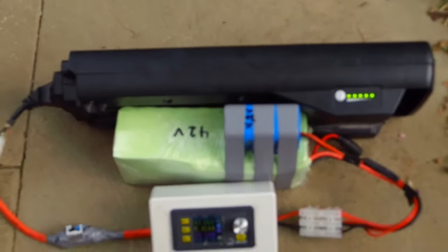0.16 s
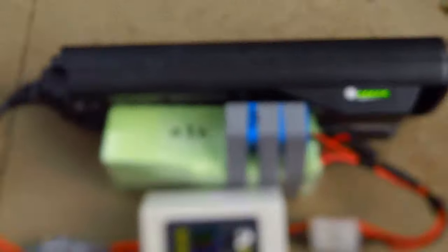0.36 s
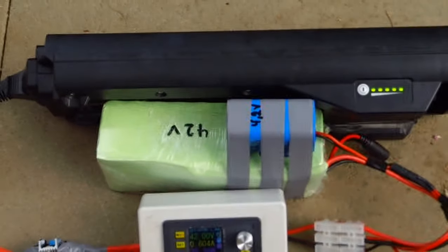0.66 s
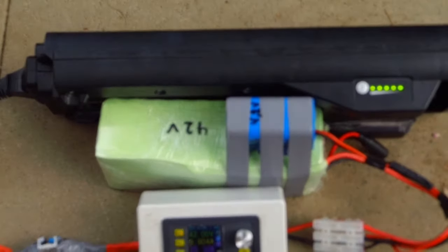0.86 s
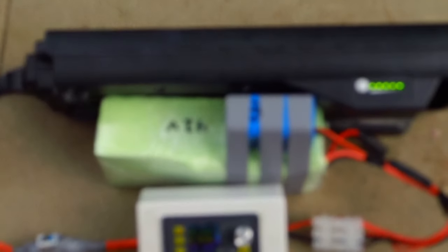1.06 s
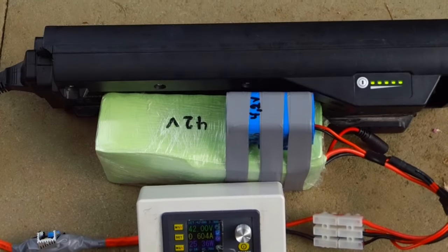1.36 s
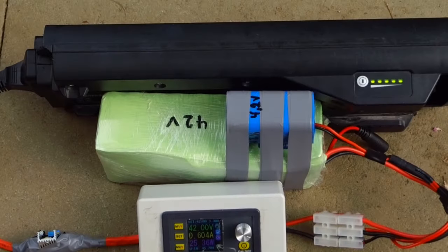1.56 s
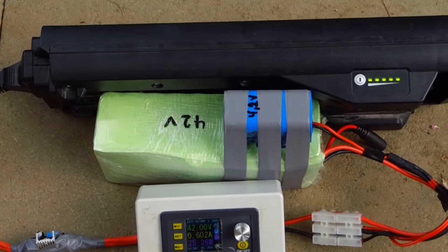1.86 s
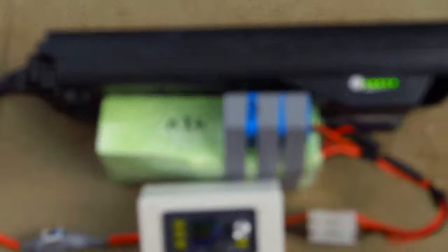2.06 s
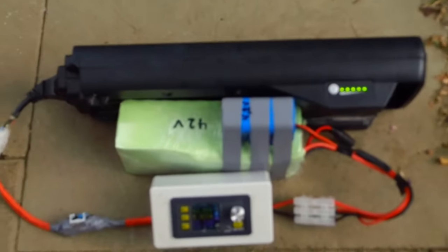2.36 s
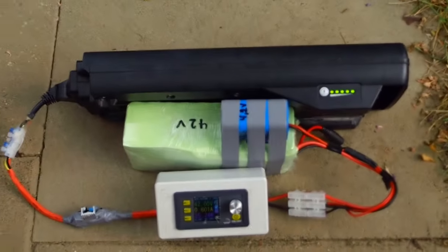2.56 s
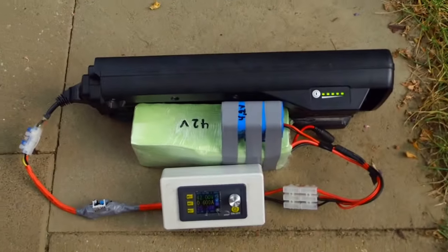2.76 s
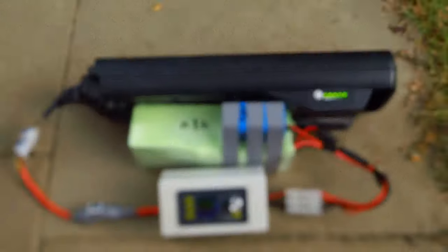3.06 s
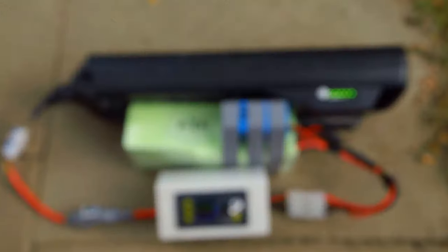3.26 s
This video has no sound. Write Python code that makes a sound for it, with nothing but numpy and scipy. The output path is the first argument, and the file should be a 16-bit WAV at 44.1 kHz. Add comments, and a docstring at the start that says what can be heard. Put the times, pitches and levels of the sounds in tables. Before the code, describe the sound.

Camera lens motor whirs in two quick spurts, then soft ring ticks and scattered plastic clicks, a long one-second zoom whir and a final spurt with knocks, heard through the camera's own stereo microphones outdoors.

```python
"""A geared lens motor whirs in a short spurt over quiet outdoor hiss, then fingers click and knock on the shell.
This is a handheld camera heard through its own stereo microphones; two rubs are noise with fine catches.
Clicks are noise cracks plus decaying modes; ring ticks are soft noise bursts; the motor is noise pulsed by gear
teeth, in short spurts around one long zoom. Band-passed noise makes the whines of the sliding lens and one
broad treble hiss near 2.5 s. The outdoor hiss is coloured noise that sinks and returns."""
import sys
import numpy as np
from scipy import signal
from scipy.fft import rfft, irfft
from scipy.io import wavfile
from scipy.ndimage import uniform_filter1d

SR = 44100
rng = np.random.default_rng(int(sys.argv[2]) if len(sys.argv) > 2 else 0)


def waveform_to_disk(signal):
    """Save audio, clipped to [-1, 1], as 16-bit WAV at the path in sys.argv[1]."""
    frames = np.transpose(np.atleast_2d(signal))
    scaled = np.clip(frames, -1, 1) * 32767
    samples = np.round(scaled).astype(np.int16)
    wavfile.write(sys.argv[1], SR, samples)


N = 149940

# contacts on the shell: (time [s], knock level [dB], clack level [dB], snap level [dB], tick level [dB],
# left minus right [dB], pitch of the struck spot [Hz], its t60 [s], contact time [s])
CLICKS = [(0.194,-54,-41,-36.5,-38,-2,3040,.02,0.00055), (0.2294,-39,-31,-20.5,-38,-2.5,2450,0.016,0.00086),
          (.25,-30.5,-27.5,-42,-41,6,1420,0.014,0.00068), (0.4597,-49.5,-42.5,-45,-72,1,2420,0.039,0.0013),
          (.5135,-58,-52.5,-55,-70,4,3840,.012,0.0036), (1.3221,-42,-31,-31.5,-29.5,-6,4310,0.008,0.00095),
          (1.339,-39,-36,-39,-50,-10,4500,0.0087,0.0014),
          (1.363,-41.5,-33.5,-56,-59,-2.5,2000,0.013,0.00061),
          (1.4291,-59,-43.5,-51,-48.5,-9,2966,0.032,0.0022),
          (1.5026,-65,-39,-52.5,-70,-9,2400,0.07,0.00042),
          (1.7228,-48.5,-40.5,-43.5,-34.5,-2.5,2590,0.036,0.00029),
          (1.7374,-44,-39,-44,-37,-4.5,2000,0.028,0.00019), (1.7527,-46,-47,-53,-55,-2.5,2350,.02,0.00075),
          (1.894,-53,-39,-46,-49,2,4070,0.035,.0008),
          (1.9511,-37.5,-30.5,-17.5,-24.5,-1.5,3480,.014,0.00074),
          (1.9818,-38.5,-34.5,-41.5,-42,0.5,2230,0.013,0.00056),
          (2.895,-54,-43,-33,-44,-2,2510,0.055,0.0014), (2.9343,-36.5,-33.5,-21,-35,-5,2655,0.029,0.00097),
          (2.9432,-33,-38,-47,-43,-2,3660,0.014,0.0012), (2.961,-32,-30.5,-44,-51,7,922,0.034,0.00091),
          (3.221,-46.5,-45.5,-53,-63,4,2910,0.044,0.0035), (3.2447,-51,-44.5,-54,-61,-1,1960,0.047,0.0016),
          (3.3696,-46.5,-50,-56,-72,6,1570,.03,0.0016)]
# knock, clack, snap and tick registers: (low [Hz], high [Hz], crack decay [s], shell ring against crack [dB])
CLICK_REGISTERS = [(755, 1610, 0.0012, -8), (1780, 4000, 0.0018, -11), (5060, 8770, 0.00054, -6),
                   (9500, 13150, 0.00052, -18.5)]
# modes of the plastic shell, levels relative: (centre frequency [Hz], level [dB], t60 [s])
SHELL_MODES = [(1005,2,0.035), (1237,4,0.036), (1466,4.5,0.02), (1800,-7.5,0.033), (2360,-22,0.054),
               (2720,8,0.025), (3180,4.5,0.03), (4150,15,0.013), (6260,4.5,0.011), (7350,-1,0.0085),
               (7940,5,0.009), (9040,-9,0.0087), (11250,-17,.008), (12200,0.5,.007)]
# soft ticks of the turning ring, before RING_GAIN_DB: (time [s], level [dB])
RING_TICKS = [(.634, -44), (.6665, -44.5), (0.698, -51), (0.734, -51.5), (.768, -52), (.811, -51),
              (0.835, -53.5), (.867, -54.5), (.9, -53.5), (0.9367, -54), (.968, -55), (1.012, -53.5),
              (1.036, -55.5), (1.133, -64.5), (1.1647, -58.5), (1.266, -61)]
# relative spectrum of a ring tick: (frequency [Hz], level [dB])
RING_COLOUR = [(200, -18), (500, -7.5), (900, -4.5), (1200, -4.5), (1550, 8), (2000, -10.5), (2500, -3),
               (3100, -13), (3800, -4.5), (5000, -19), (8000, -20), (15000, -48)]
# runs of the lens motor: (start [s], stop [s], level at mid-run [dB], mean gear rate [Hz])
MOTOR_RUNS = [(-.02, 0.135, -46.5, 125), (0.183, 0.301, -39.5, 224), (1.83, 1.896, -54.5, 133),
              (1.886, 2.839, -41.5, 157.5), (2.887, 3.008, -38, 224.7)]
# relative spectrum of the whir: (frequency [Hz], level [dB])
MOTOR_COLOUR = [(40, -24), (150, -27), (350, -17), (680, -12), (950, -6), (1500, -5.5), (2200, -9),
                (3700, -10.5), (5000, -11.5), (6500, -9), (8500, -13.5), (10500, -14), (13000, -10),
                (14000, -19), (16000, -29)]
# resonances of the lens barrel, levels relative: (frequency [Hz], width [Hz], level [dB], left minus right [dB])
BARREL_MODES = [(390, 140, -5, 8), (880, 69, -6, 11), (1250, 94, 0.5, 3), (2730, 100, 4, -6),
                (3650, 590, 1, 13), (4020, 300, 1, 12), (4370, 300, 3, -7), (6120, 270, 0.5, 3),
                (7900, 380, -3.5, -19)]
# whines of the sliding lens, and one broad treble hiss near 2.5 s:
# (start [s], stop [s], centre frequency [Hz], width [Hz], level [dB])
WHINES_AND_HISS = [(1.885, 1.945, 4130, 480, -44), (2.275, 2.35, 2780, 170, -48),
                   (2.45, 2.49, 2820, 170, -51), (2.805, 2.844, 2800, 220, -50),
                   (2.03, 2.777, 1000, 14, -62), (2.51, 2.558, 10900, 5000, -48)]
# fingers rubbing on the shell: (start [s], stop [s], level before the housing [dB])
RUBS = [(0.227, 0.292, -32.5), (2.93, 2.991, -32.5)]
# relative spectrum of the rubbing: (frequency [Hz], level [dB])
RUB_COLOUR = [(30, -30.5), (120, -21), (300, -16.5), (600, -13), (950, 2), (1500, -7), (2000, -2.5),
              (3800, 1), (5000, -8.5), (8000, -7.5), (12500, -7.5), (15500, -23)]
# rise and fall of the outdoor hiss: (time [s], level [dB])
AIR_LEVEL = [(0, -57), (.17, -59.5), (.3, -50), (.42, -50.5), (.56, -52.5), (.79, -56), (1.08, -62),
             (1.22, -64), (1.314, -64), (1.349, -50.5), (1.47, -52), (1.68, -55.5), (1.85, -56),
             (2.86, -55.5), (3.03, -48.5), (3.4, -51)]
# relative spectrum of the hiss: (frequency [Hz], level [dB])
AIR_COLOUR = [(25, -12.5), (100, -15), (220, -13), (400, -5.5), (650, -3.5), (900, 1), (1550, 0),
              (2100, -1.5), (3000, -4), (5000, -9), (9000, -11), (15000, -13.5)]

CLICK_GAIN_DB, CLICK_WINDOW_S = 0, 0.0083  # the window over which a click's level counts
SPOT_DB = -1.5  # struck spot against the clack level
REBOUND_S, REBOUND_DB, TAIL_S, TAIL_DB = 0.0042, -12, 0.0042, -10  # relative to the crack
THUD_DB, THUD_DECAY_S, THUD_HZ = -28, 0.011, 300  # level against the knock; upper band edge
RING_RISE_S, RING_DECAY_S, RING_GAIN_DB, RING_PAN_DB = 0.0015, 0.0055, 2.3, 4.5
RING_BRIGHTEN = 0.37  # dB per octave for each dB above the median tick
MOTOR_RISE_S, MOTOR_FALL_S, MOTOR_ARCH_DB = 0.0098, 0.0044, 3
TOOTH_DECAY, TOOTH_DEPTH, TOOTH_SCATTER_DB = 0.53, 1, 4.5  # decay in tooth cycles
SPEED_WOBBLE, LOAD_DB = 0.012, -0.1  # speed drift as a fraction, level drift in dB
BARREL_SWELL_DB, BARREL_SWELL_HZ, BARREL_DB = 1.5, 9, -0.5
WHINE_FADE_S = 0.012
HOUSING_DB, HOUSING_DECAY_S, HOUSING_TOP_HZ = -3, 0.0097, 5000
RUB_RISE_S, RUB_FALL_S, RUB_GRAIN_DB = 0.0049, 0.0064, 2
# left-right correlation of each noise
AIR_LIKENESS, MOTOR_LIKENESS, RUB_LIKENESS, CLICK_LIKENESS = 0.25, 0.033, -0.05, -0.12
TOP_HZ = 15500


def undb(db):
    """Decibels to gain."""
    return 10 ** (np.asarray(db) / 20)


def unit(x):
    """Scale to rms 1."""
    return x / np.sqrt(np.mean(x ** 2) + 1e-20)


def pan(db):
    """Left and right gains of constant power, from left minus right in dB."""
    return unit(undb(np.array([[db], [-db]]) / 2))


def pair(size, likeness):
    """Stereo noise with a chosen correlation between the two microphones."""
    mid, side = rng.standard_normal((2, size))
    c = np.clip(likeness, -.95, .95)
    opposed = side * np.array([[1], [-1]])
    return (np.sqrt(1 + c) * mid + np.sqrt(1 - c) * opposed) / np.sqrt(2)


def walk(rate):
    """Smooth random drift of rms 1, with a new target at the given rate in Hz."""
    hold = int(SR / rate)
    steps = np.repeat(rng.standard_normal(N // hold + 1), hold)
    return unit(uniform_filter1d(steps, hold)[:N])


def colour(x, points, tilt_db=0):
    """Shape a sound by a spectrum and a tilt in dB per octave, then bring it to rms 1."""
    size = x.shape[-1]
    f = np.maximum(np.arange(size // 2 + 1) * SR / size, 1)
    hz, db = np.array(points).T
    curve_db = np.interp(np.log(f), np.log(hz), db) + tilt_db * np.log2(f)
    return unit(irfft(rfft(x) * undb(curve_db), size))


def band(x, lo, hi, order=3):
    """Causal band-pass."""
    edges = [lo, min(hi, SR / 2 - 1000)]
    return signal.sosfilt(signal.butter(order, edges, "band", fs=SR, output="sos"), x)


def gate(start, stop, rise, fall):
    """Linear attack, hold and exponential release."""
    t = np.arange(N) / SR
    return np.clip((t - start) / rise, 0, 1) * np.exp(-np.maximum(t - stop, 0) / fall)


def burst(x, db):
    """Set each channel's energy to the given level over the click window."""
    energy = np.sum(x ** 2, axis=-1, keepdims=True)
    return x * undb(db) / np.sqrt(energy / (CLICK_WINDOW_S * SR))


def add(out, at, x):
    """Mix a short sound in at a time in seconds."""
    i = int(at * SR)
    out[:, i:i + x.shape[1]] += x[:, :N - i]


def mode(t, hz, t60):
    """One decaying resonance, with its own random phase at each microphone."""
    return np.exp(-np.log(1000) * t / t60) * np.sin(2 * np.pi * (hz * t + rng.random((2, 1))))


def clicks(size=4096):
    """Each contact cracks and rebounds, rings the struck spot and the plastic shell, and gives a faint thud."""
    out, t = np.zeros((2, N)), np.arange(size) / SR
    for at, knock_db, clack_db, snap_db, tick_db, pan_db, spot_hz, spot_t60, contact in CLICKS:
        push = np.sin(np.pi / 2 * np.minimum(t / contact, 1)) ** 2
        ring = 0
        for hz, db, t60 in SHELL_MODES:
            detune = 1 + 0.0096 * rng.standard_normal()
            ring = ring + undb(db) * mode(t, hz * detune, t60)
        noise = pair(size, CLICK_LIKENESS)
        sound = burst(mode(t, spot_hz, spot_t60) * push, clack_db + SPOT_DB)
        levels = (knock_db, clack_db, snap_db, tick_db)
        for (lo, hi, decay, ring_db), db in zip(CLICK_REGISTERS, levels):
            crack = np.exp(-np.maximum(t - contact, 0) / decay)
            rebound = undb(REBOUND_DB) * np.exp(-abs(t - contact - REBOUND_S) / decay)
            tail = undb(TAIL_DB) * np.exp(-t / TAIL_S)
            grit = unit(band(noise, lo, hi)) * (crack + rebound + tail)
            shell = undb(ring_db) * band(ring, lo, hi)
            sound = sound + burst((grit + shell) * push, db)
        thud = band(pair(size, CLICK_LIKENESS) * np.exp(-t / THUD_DECAY_S), 20.6, THUD_HZ, order=1)
        sound = sound + burst(thud, knock_db + THUD_DB)
        add(out, at, undb(CLICK_GAIN_DB) * pan(pan_db) * sound)
    return out


def lens_motor():
    """Gear teeth rasp once a cycle through the barrel; each run's drive arches up towards its middle."""
    t, drive = np.arange(N) / SR, 0
    for start, stop, db, gear_hz in MOTOR_RUNS:
        turns = np.cumsum(gear_hz * (1 + SPEED_WOBBLE * walk(8.5))) / SR  # tooth cycles so far
        tooth_gains = undb(TOOTH_SCATTER_DB * np.tanh(rng.standard_normal(N // 20)))
        teeth = tooth_gains[turns.astype(int)]
        rasp = unit(1 + TOOTH_DEPTH * teeth * np.exp(-(turns % 1) / TOOTH_DECAY))
        progress = np.clip((t - start) / (stop - start), 0, 1)
        arch_db = MOTOR_ARCH_DB * (np.sin(np.pi * progress) - 1)
        drive = drive + rasp * gate(start, stop, MOTOR_RISE_S, MOTOR_FALL_S) * undb(db + arch_db)
    whir = unit(colour(pair(N, MOTOR_LIKENESS), MOTOR_COLOUR) + undb(BARREL_DB) * barrel())
    return whir * drive * undb(LOAD_DB * walk(28))


def barrel():
    """Noise rings the lens barrel's resonances, each swelling by itself as the lens groups slide."""
    out = 0
    for hz, width, db, pan_db in BARREL_MODES:
        ringing = signal.lfilter(*signal.iirpeak(hz, hz / width, fs=SR), pair(N, MOTOR_LIKENESS))
        swell_db = BARREL_SWELL_DB * walk(BARREL_SWELL_HZ)
        out = out + ringing * pan(pan_db) * undb(db + swell_db)
    return unit(out)


def whines_and_hiss():
    """Band-passed noise: the sliding lens sings now and then, and the treble hisses once, broadly."""
    out = 0
    for start, stop, hz, width, db in WHINES_AND_HISS:
        strand = unit(band(pair(N, MOTOR_LIKENESS), hz - width / 2, hz + width / 2, order=2))
        out = out + strand * gate(start, stop, WHINE_FADE_S, WHINE_FADE_S) * undb(db)
    return out


def rubs():
    """Skin drags over the shell in fine catches, a fast random flutter on coloured noise."""
    press = sum(undb(db) * gate(start, stop, RUB_RISE_S, RUB_FALL_S) for start, stop, db in RUBS)
    skin = colour(pair(N, RUB_LIKENESS), RUB_COLOUR)
    catches = unit(undb(RUB_GRAIN_DB * walk(350)))
    return skin * press * catches


def housing(x, size=2048):
    """The hollow body answers rubbing and whirring with a short, dense ring of its own."""
    tail = rng.standard_normal((2, size)) * np.exp(-np.arange(size) / SR / HOUSING_DECAY_S)
    tail = tail / np.sqrt(np.sum(tail ** 2, axis=1, keepdims=True))
    tail = band(tail, 260, HOUSING_TOP_HZ, order=1)
    answer = signal.fftconvolve(x, tail, axes=1)[:, :N]
    return (x + undb(HOUSING_DB) * answer) / np.sqrt(1 + undb(HOUSING_DB) ** 2 / 2)


def ring_ticks(size=2048):
    """Cushioned detents of the turning ring; those harder than the median are brighter."""
    out, t = np.zeros((2, N)), np.arange(size) / SR
    usual_db = np.median(np.array(RING_TICKS)[:, 1])
    shape = np.minimum(t / RING_RISE_S, 1) * np.exp(-t / RING_DECAY_S)
    for at, db in RING_TICKS:
        tilt_db = RING_BRIGHTEN * max(db - usual_db, 0)
        scuff = colour(pair(size, CLICK_LIKENESS), RING_COLOUR, tilt_db)
        add(out, at, pan(RING_PAN_DB) * burst(scuff * shape, db + RING_GAIN_DB))
    return out


def air():
    """Soft outdoor hiss, coloured noise that sinks and returns."""
    db = np.interp(np.arange(N) / SR, *np.array(AIR_LEVEL).T)
    return colour(pair(N, AIR_LIKENESS), AIR_COLOUR) * undb(db)


def scene():
    """Everything that reaches the two microphones."""
    return clicks() + ring_ticks() + whines_and_hiss() + housing(lens_motor() + rubs()) + air()


def record(dry):
    """The recorder clips at full scale and steeply cuts the top."""
    top_cut = signal.ellip(8, .2, 80, TOP_HZ, fs=SR, output="sos")
    return signal.sosfilt(top_cut, np.clip(dry, -1, 1))


dry = scene()
out = record(dry)
waveform_to_disk(out)
```